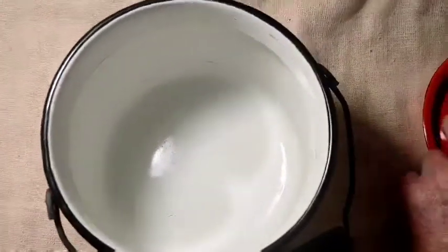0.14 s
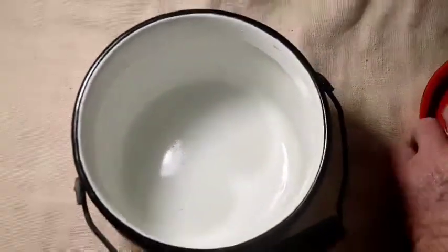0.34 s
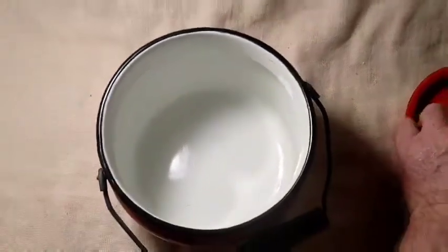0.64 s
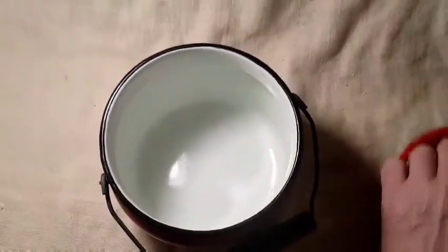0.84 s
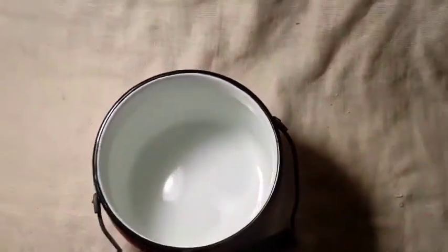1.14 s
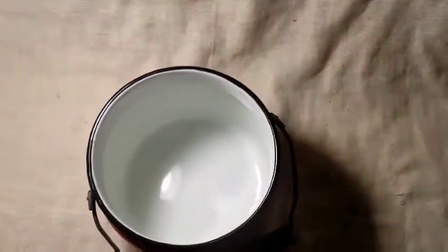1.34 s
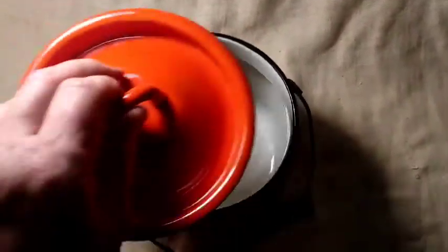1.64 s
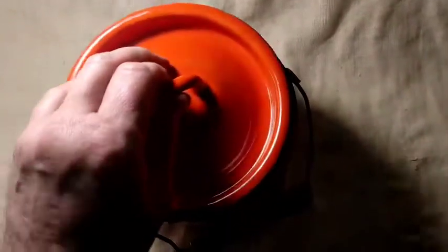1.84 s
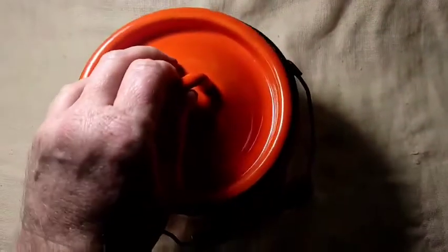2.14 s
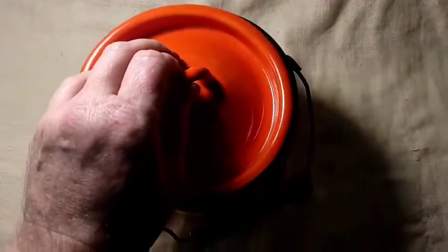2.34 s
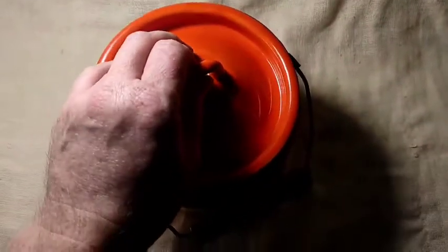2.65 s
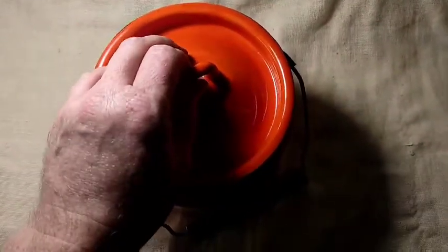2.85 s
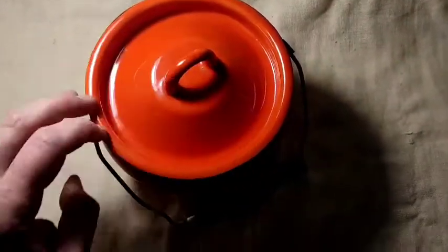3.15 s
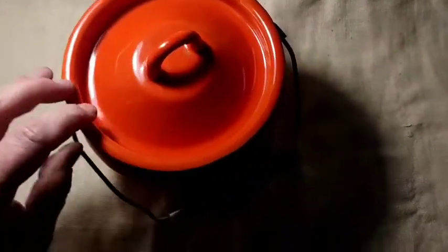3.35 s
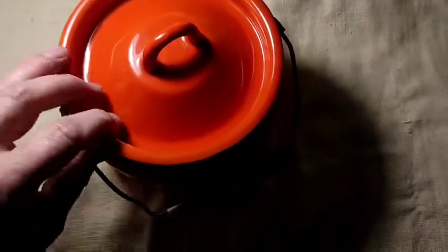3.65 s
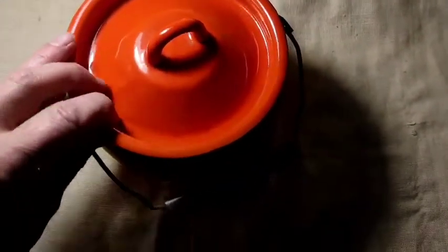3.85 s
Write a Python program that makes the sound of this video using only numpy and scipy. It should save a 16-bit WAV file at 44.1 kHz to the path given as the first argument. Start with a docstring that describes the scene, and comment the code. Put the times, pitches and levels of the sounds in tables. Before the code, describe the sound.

An enamel lid clanks onto an empty metal can, then settles with a hollow boom.

```python
"""A quiet room hums and hisses. A soft thud and a bright tick open the scene; an enamelled steel lid rings
faintly in the hand and a thin squeak glides by. At 2.1 s the lid strikes the rim of an empty enamelled
can standing on cloth: each hit is a chatter of tiny touches that sets the metal ringing and clattering.
The lid slides, drops into its seat at 2.75 s with a hollow boom of trapped air and rubs on the rim.
A faint gritty swell leads into a last nudge at 3.8 s. A short room echo follows the hits."""
import sys
import numpy as np
from scipy import signal
from scipy.io import wavfile

SR = 44100
rng = np.random.default_rng(int(sys.argv[2]) if len(sys.argv) > 2 else 0)


def dump_mix(stems):
    """Bounce the given channels to the path in sys.argv[1] as a 16-bit WAV at rate SR."""
    frames = np.atleast_2d(stems).T  # one column per channel
    limited = np.clip(frames, -1, 1)  # hard clip at full scale
    pcm = np.round(limited * 32767).astype(np.int16)
    wavfile.write(sys.argv[1], SR, pcm)


N = 176400
TIME = np.arange(N) / SR

# colour of the room tone: f/Hz, relative level/dB per Hz
ROOM_SPECTRUM = [(20, 0.5), (45, -13.5), (80, -13.5), (120, -20), (180, -6), (250, -4), (330, -14),
                 (520, -10), (900, -13.5), (1200, -24.5), (2500, -24.5), (4000, -28), (8500, -28),
                 (12500, -54.5), (18000, -70)]
# level of the treble hiss, which swells with faint rustles: t/s, level/dB (unity gain at TREBLE_UNITY_DB)
TREBLE_LEVEL = [(0.0, -66), (0.05, -75.5), (0.06, -63.5), (0.14, -74), (0.3, -72), (0.34, -77.5),
                (0.41, -74), (0.55, -75.5), (0.65, -69.5), (0.82, -76.5), (1.0, -73), (1.01, -69),
                (1.15, -77), (1.17, -71.5), (1.37, -74), (1.47, -70.5), (1.53, -74.5), (2.1, -80)]
# how alike the room tone is left and right: f/Hz, correlation (negatives play as about 0)
STEREO_LIKENESS = [(60, 0.376), (180, 0.3), (550, 0.034), (1650, 0.114), (4970, -0.02), (15000, -0.06)]
# room hums: f/Hz, level/dB, width of the noise skirt/Hz, noise-to-tone ratio
HUMS = [(118.4, -62.5, 4.8, 0.079), (260.3, -60.5, 5.6, 0.3), (514, -73.5, 5.7, 0.28)]
# can pressed into the cloth: t/s, level/dB
THUDS = [(.058, -53), (2.131, -51), (2.764, -36), (2.866, -43), (3.221, -34), (3.82, -37)]
# partials of the tick: f/Hz, level/dB, t60/s
TICK_MODES = [(3160, -58, 0.15), (3900, -52, .1), (4080, -53, 0.074), (4440, -50, 0.065),
              (5000, -52, 0.041), (5350, -55, 0.045), (6870, -54, 0.086), (8560, -46, 0.055)]
# faint tones, mostly the held lid ringing, plus a steady whistle beside the squeak: start/s, end/s, f/Hz,
# level/dB
FAINT_RINGS = [(.06, .14, 3042, -77), (.25, .3, 4520, -82), (.38, .52, 4520, -82), (.38, .53, 4040, -86),
               (.56, .66, 2860, -78), (.62, .69, 8350, -77), (.67, .73, 4520, -82)]
# glide of the squeak: t/s, f/Hz, level/dB
SQUEAK_GLIDE = [(.595, 7800, -95), (.62, 8350, -80), (.65, 8880, -78), (.69, 9120, -78), (.72, 8950, -80),
                (.77, 8050, -82), (.82, 7600, -88), (.87, 8400, -77), (.92, 9250, -80), (.965, 9620, -79),
                (1.01, 9350, -92)]
TILTED, SEATED, NUDGED, SETTLED = 0, 1, 2, 3   # how the lid sits
# lid meets rim: t/s, level/dB, chatter length/s, brightness/dB per octave,
# boom level/dB (before BOOM_GAIN_DB), boom f/Hz, how the lid sits
CONTACTS = [(2.126, -18.5, 0.014, 4, -21.5, 334.6, TILTED), (2.144, -20.5, 0.013, 1, -27.5, 311, TILTED),
            (2.275, -49.5, 0.0097, -6, -46, 340, TILTED), (2.346, -64, 0.0053, -10.5, -60.5, 322, TILTED),
            (2.462, -50.5, 0.0099, -6.5, -70, 298, TILTED), (2.589, -50.5, 0.022, 3.5, -49.5, 310, SEATED),
            (2.621, -57, 0.014, -8.5, -47, 315, TILTED), (2.703, -45, 0.095, 3.5, -37, 297, TILTED),
            (2.752, -26.5, 0.0063, -0.5, -23, 181.8, SEATED),
            (2.767, -27.5, 0.016, 2.5, -25.5, 176.6, SEATED), (2.811, -37, 0.023, -3.5, -45.5, 345, SEATED),
            (2.852, -34.5, 0.0065, -3, -34.5, 255, SETTLED), (2.863, -22.5, .012, 1, -28.5, 171.6, SETTLED),
            (2.962, -38, 0.0053, -3.5, -51, 194, NUDGED), (3.209, -62, .005, 3, -63, 180, SEATED),
            (3.802, -23.5, 0.012, 1.5, -40, 164, NUDGED), (3.813, -24.5, 0.012, -2.5, -30.5, 167, NUDGED)]
# clear modes of lid and can: f/Hz, t60/s, relative level/dB when tilted, seated, nudged, settled
METAL_MODES = [(345, 0.11, -14, -4.5, -15.5, -4), (616, 0.088, -15, -10.5, -8, -12.5),
               (844, 0.14, -15.5, -10, -3, -26), (1340, .16, -10, -5, -10.5, -12),
               (1438, .14, 0.5, -16, -7.5, -24), (1520, .14, -7.5, -3.5, -9.5, -5.5),
               (1549, 0.084, -11, -9, -14, -2), (1865, .12, -12.5, -16, -18, -10),
               (2090, .12, -11.5, -8.5, -9, -29), (2508, .45, -21, -26.5, -26.5, -25),
               (2527, .15, -9.5, -10, -13.5, -23), (2723, .2, -13, -12, -14, -6),
               (2741, 0.43, -9.5, -10, -14, -18), (3013, 0.19, -4, -31, -14, -15),
               (3080, 0.17, 1.5, -3.5, -13, -13.5), (3260, 0.071, -22.5, -20, -11, -25),
               (3550, .15, -17.5, -22, -26, -5.5), (3910, 0.093, -0.5, -2, 2, -7),
               (4030, .14, -13, -5, -7, -22), (4520, 0.079, -7.5, -9, -28, 4),
               (4700, 0.17, -7.5, -12, -14, -16), (4930, .13, -11.5, -29, -33, -22),
               (5383, .11, -3, -0.5, -2.5, -13), (5450, .13, -5.5, -2, -1, -4),
               (5940, .5, -41.5, -34, -50, -13), (6130, .13, -8.5, -2, -9, 1),
               (6206, .14, -2.5, -9.5, -16, -3), (6470, .18, -18.5, -22, -7, -20),
               (6980, .12, -15.5, -11.5, -3, -15), (7122, 0.11, -9.5, -11, -13, -2),
               (7646, 0.058, -0.5, -2, -1.5, -1.5), (8190, .07, -22, -3.5, -10.5, -18),
               (8350, 0.02, -23.5, -12, -18, -7)]
# colour of the clatter, one curve for each way the lid sits: f/Hz, relative level/dB per Hz
CLATTER_SPECTRA = [
    [(240, -45), (400, -10), (1390, -7), (2290, -9), (2980, -10.5), (5380, -6), (7820, -16.5), (10500, -41),
     (12500, -37.5), (15700, -58), (16500, -67.5)],
    [(240, -38), (400, -15.5), (899, -6), (1460, -4), (2320, -6), (2670, -1.5), (6090, -6.5),
     (13700, -21.5), (16500, -27.5)],
    [(240, -47), (400, -29), (831, 5), (986, -6.5), (1330, -7.5), (2930, -7.5), (7010, -5.5),
     (10000, -20.5), (12500, -21), (15300, -29), (16500, -50)],
    [(240, -38), (400, -13), (899, -5), (1460, -5.5), (2320, -6), (4500, -2.5), (6090, 2), (9000, -20),
     (13700, -27), (16500, -23)],
]
# three slides of the lid on the rim, then a faint gritty swell just before the last nudge:
# t/s, level/dB (before GRIT_GAIN_DB)
GRIT_CURVES = [
    [(2.25, -56.5), (2.414, -59.5), (2.448, -50), (2.636, -54), (2.686, -71), (2.702, -30), (2.72, -56)],
    [(2.77, -61), (2.785, -30), (2.82, -34), (2.85, -35), (2.89, -36), (2.92, -55), (2.945, -63)],
    [(3.28, -88), (3.326, -56.5), (3.332, -61), (3.426, -56.5), (3.462, -70.5), (3.472, -51), (3.6, -104)],
    [(3.74, -80.5), (3.785, -50.5), (3.8, -45)],
]

SIDES = np.array([[1], [-1]])   # left up, right down
LEFT_DB, LEFT_LAG_S = 1.4, 0.00018
ROOM_TONE_DB, TONE_LEFT_DB, TONE_TOP_HZ = -56.5, 1.6, 8890
TREBLE_UNITY_DB, TREBLE_LATE_DB = -71, -76.5
TOUCHES_PER_S, FIRST_TOUCH, CHATTER_FADE = 2500, 1.6, 0.69
CLATTER_DB, CLATTER_T60_S, CLATTER_DAMPING, CLATTER_ALIKE = 6.5, 0.06, 0.19, 0.45
BOOM_GAIN_DB, BOOM_RISE_S, BOOM_T60_S = 12, 0.009, 0.1
SEALED_HZ, BOOM_SAG, BOOM_SAG_S = 250, 0.98, 0.0048   # below SEALED_HZ the squeezed air starts sharp
GRIT_GAIN_DB, GRIT_RING_DB, GRIT_DB_PER_OCTAVE = -8.5, -32, -1.5
GRIT_DAMPING_S = 0.12   # longer rings are stirred less by the grit
SLIDE_AIR_DB, SLIDE_AIR_HZ = -25, 305.4
ECHO_DB, ROOM_T60_S, WALL_CUT_HZ = -14, 0.26, 12000


def from_db(db):
    """Level to gain."""
    return 10 ** (np.asarray(db) / 20)


def rms_one(x):
    """Scale to unit power."""
    return x / np.sqrt(np.mean(x ** 2) + 1e-20)


def filtered(x, order, hz, kind="low"):
    """Butterworth filter."""
    return signal.sosfilt(signal.butter(order, hz, kind, fs=SR, output="sos"), x)


def at_hz(points, hz):
    """Read a curve on a log frequency axis."""
    freqs, values = np.transpose(points)
    return np.interp(np.log(hz), np.log(freqs), values)


def in_time(rows, outside):
    """A level curve at every sample."""
    times, db = np.transpose(rows)
    return np.interp(TIME, times, db, outside, outside)


def ring(force, hz, t60):
    """Resonator: a unit click starts a dying sine of height 1."""
    r, w = from_db(-60 / (t60 * SR)), 2 * np.pi * hz / SR
    return signal.lfilter([0, np.sin(w)], [1, -2 * r * np.cos(w), r * r], force + 1e-18)


def waver(depth_db, rate_hz=30):
    """A gain that wanders at random around unity."""
    drift = filtered(rng.standard_normal(N + SR), 2, rate_hz)[SR:]
    return from_db(depth_db * rms_one(drift))


def grit(per_s, spread_db=3.5):
    """Uneven random clicks, unit power."""
    chance, size, sign = rng.random((3, N))
    height = from_db(-spread_db * np.log(size + 0.069))
    return rms_one((chance < per_s / SR) * height * np.sign(sign - .5))


def placed(x):
    """Pan mono or stereo: louder and slightly later on the left."""
    left, right = np.broadcast_to(x, (2, N))
    return from_db(LEFT_DB * SIDES) * np.array([np.interp(TIME - LEFT_LAG_S, TIME, left), right])


def room_tone():
    """A wide bed of noise in half-octave bands; the treble flickers."""
    out, white = 0, rng.standard_normal((2, 2, N))
    treble_db = in_time(TREBLE_LEVEL, TREBLE_LATE_DB) - TREBLE_UNITY_DB
    edges = 18 * 2 ** np.arange(0, 10, .5)
    for k, (low, high) in enumerate(zip(edges, edges[1:])):
        hz = np.sqrt(low * high)
        mid, side = filtered(white[k % 2], 2, [low, high], "band")
        alike = at_hz(np.maximum(STEREO_LIKENESS, 1e-3), hz)
        band = np.sqrt(1 + alike) * mid + np.sqrt(1 - alike) * side * SIDES
        treble_share = np.clip(np.log2(hz / 1500), 0, 1)
        out += from_db(at_hz(ROOM_SPECTRUM, hz) + treble_share * treble_db) * band
    return from_db(ROOM_TONE_DB + TONE_LEFT_DB * SIDES) * rms_one(filtered(out, 6, TONE_TOP_HZ))


def hums():
    """Low room tones, each made unsteady by a narrow skirt of noise."""
    out = 0
    for hz, db, width, ratio in HUMS:
        skirt = rms_one(ring(rng.standard_normal(N), hz, t60=9.3 / width))
        out += from_db(db) * rms_one(np.sin(2 * np.pi * hz * TIME) + ratio * skirt)
    return placed(out)


def thuds(hz=82.2, t60=0.099):
    """The can presses into the cloth: soft, quickly damped bass notes."""
    out = 0
    for start, db in THUDS:
        age = np.clip(TIME - start, 0, 1)
        attack = np.minimum(age * hz, 1)
        out += attack * from_db(db - 60 * age / t60) * np.sin(2 * np.pi * hz * age)
    return placed(out)


def tick(start=0.058, noise_db=-41.5, noise_hz=4760, noise_t60=0.046):
    """A small bright tick: high partials over a puff of noise."""
    age = np.clip(TIME - start, 0, 1)
    ping = sum(from_db(db - 60 * age / t60) * np.sin(2 * np.pi * hz * age) for hz, db, t60 in TICK_MODES)
    noise = filtered(rng.standard_normal(N), 1, [noise_hz / 2, noise_hz * 2], "band")
    return placed(ping + (age > 0) * noise * from_db(noise_db - 60 * age / noise_t60))


def faint_rings():
    """Short, wavering swells of one pitch each: the held lid sings, and a steady whistle sits beside the
    squeak."""
    out = 0
    for start, end, hz, db in FAINT_RINGS:
        swell = np.sin(np.pi * np.clip((TIME - start) / (end - start), 0, 1))
        out += from_db(db) * waver(depth_db=2.5) * swell * np.sin(2 * np.pi * hz * TIME)
    return out * from_db(LEFT_DB * SIDES)


def squeak():
    """A thin, wavering whistle that glides up, down and up again."""
    times, hz, db = np.transpose(SQUEAK_GLIDE)
    cycles = np.cumsum(np.interp(TIME, times, hz)) / SR
    envelope = from_db(np.interp(TIME, times, db, -200, -200)) * waver(depth_db=2.5)
    return envelope * np.sin(2 * np.pi * cycles) * from_db(LEFT_DB * SIDES)


def strikes(spread_db=1.5):
    """The lid chatters on the rim: the force on each clear mode and on each colour of clatter."""
    touches = grit(TOUCHES_PER_S)
    hz, _, *mode_db = np.transpose(METAL_MODES)
    mode_force, clatter_force = np.zeros((len(hz), N)), np.zeros((len(CLATTER_SPECTRA), N))
    for start, db, length, brightness, _, _, sits in CONTACTS:
        span = slice(int(start * SR), int((start + length) * SR))
        chatter = rms_one(touches[span])
        chatter[0] += FIRST_TOUCH
        chatter *= np.exp(-CHATTER_FADE * (TIME[span] - start) / length)
        # even out how strongly this chatter happens to excite each mode
        response = np.abs(np.exp(2j * np.pi * np.outer(hz, TIME[span])) @ chatter)
        response += np.linalg.norm(chatter) / 2
        levels = db + mode_db[sits] + brightness * np.log2(hz / 3000) + rng.normal(0, spread_db, len(hz))
        mode_force[:, span] += np.outer(from_db(levels) / response, chatter)
        dull = np.clip(-brightness / 6, -.9, .9)
        coloured = signal.lfilter([1 - abs(dull)], [1, -dull], chatter)
        clatter_force[sits, span] += from_db(db + CLATTER_DB) * coloured / np.sqrt(length * 100)
    return mode_force, clatter_force


def metal_ring(forces, pan_spread_db=2):
    """Lid and can ring in clear modes; loose contact makes each one waver."""
    out, wobble = 0, waver(depth_db=3)
    for (hz, t60, *_), force in zip(METAL_MODES, forces):
        tone = ring(force, hz, t60) * np.roll(wobble, rng.integers(N))
        lag = round(SR * min(1 / hz / 4, LEFT_LAG_S))   # up to a quarter cycle late on the left
        pan_db = LEFT_DB + rng.normal(0, pan_spread_db) / 2
        out += np.array([np.roll(tone, lag), tone]) * from_db(pan_db * SIDES)
    return out


def clatter(force, spectrum, modes=240):
    """A crowd of short, hand-damped modes at chance pitches; the high ones die sooner."""
    t = np.arange(SR // 6)[:, None] / SR
    detune, life, phase, *side_phase = rng.random((5, modes))
    hz = 400 + 15600 * ((np.arange(modes) + detune) / modes) ** 1.5
    t60 = CLATTER_T60_S * (.5 + life) * (3000 / hz) ** CLATTER_DAMPING
    envelope = from_db(at_hz(spectrum, hz) - 60 * t / t60) * np.sqrt(np.gradient(hz))
    phases = phase + (1 - CLATTER_ALIKE) * (np.array(side_phase) - .5)
    response = np.array([(envelope * np.sin(2 * np.pi * (hz * t + p))).sum(axis=1) for p in phases])
    response[:, :32] *= np.arange(32) / 32   # soften the attack
    response /= np.sqrt((response ** 2).sum() / 2)
    return placed(signal.fftconvolve(force[None], response)[:, :N])


def boom():
    """The air in the can swells and dies; the better the lid seals, the lower the pitch."""
    out, t = np.zeros(N + SR), np.arange(SR // 4) / SR
    sag = BOOM_SAG * BOOM_SAG_S * (1 - np.exp(-t / BOOM_SAG_S))
    swell = (1 - np.exp(-t / BOOM_RISE_S)) ** 2
    for start, _, _, _, db, hz, _ in CONTACTS:
        cycles = hz * (t + (hz < SEALED_HZ) * sag)
        envelope = swell * from_db(db + BOOM_GAIN_DB - 60 * t / BOOM_T60_S)
        out[int(start * SR):][:len(t)] += envelope * np.sin(2 * np.pi * cycles)
    return placed(out[:N])


def slides_and_swell():
    """Fitful grit drives modes and clatter; the first slide also stirs the air in the can."""
    envelope = sum(from_db(in_time(curve, -200) + GRIT_GAIN_DB) for curve in GRIT_CURVES)
    grains = grit(per_s=1400) * envelope * waver(depth_db=3.5, rate_hz=24)
    hz, t60, *mode_db = np.transpose(METAL_MODES)
    gains = from_db(mode_db[SEATED] + GRIT_RING_DB + GRIT_DB_PER_OCTAVE * np.log2(hz / 3000))
    mode_force = np.outer(gains * np.minimum(GRIT_DAMPING_S / t60, 1), grains)
    first_slide_end, second_slide_start = GRIT_CURVES[0][-1][0], GRIT_CURVES[1][0][0]
    clatter_force = np.zeros((len(CLATTER_SPECTRA), N))
    clatter_force[TILTED] = grains * (TIME < second_slide_start)
    clatter_force[SEATED] = grains * (TIME >= second_slide_start)
    air = from_db(SLIDE_AIR_DB) * ring(grains * (TIME < first_slide_end), SLIDE_AIR_HZ, t60=0.098)
    return mode_force, clatter_force, placed(air)


def lid():
    """Strikes and grit drive the same metal; the lows are rolled off."""
    mode_hits, clatter_hits = strikes()
    mode_grit, clatter_grit, air = slides_and_swell()
    metal = metal_ring(mode_hits + mode_grit)
    for force, spectrum in zip(clatter_hits + clatter_grit, CLATTER_SPECTRA):
        metal += clatter(force, spectrum)
    return filtered(metal + air, 2, 150, "high")


def room_echo(x):
    """Wall reflections: eight feedback delays a side, duller on every round."""
    out, dull = np.zeros((2, N)), np.exp(-2 * np.pi * WALL_CUT_HZ / SR)
    for k, lag in enumerate((rng.uniform(.012, .035, 16) * SR).astype(int)):
        loop, state = x.copy(), [0.]
        gain = from_db(-60 * lag / SR / ROOM_T60_S)
        for i in range(lag, N, lag):
            back, state = signal.lfilter([gain * (1 - dull)], [1, -dull], loop[i - lag:i], zi=state)
            loop[i:i + lag] += back[:N - i]
        out[k % 2] += (loop - x) * (-1) ** (k // 2)
    return out


def scene():
    """The mix: thuds, tick and lid feed the echo; the other layers stay dry."""
    near = thuds() + tick() + lid()
    echo = from_db(ECHO_DB) * room_echo(near[1] + 1e-18)
    return room_tone() + hums() + near + faint_rings() + squeak() + boom() + echo


def record(dry, low_hz=30, top_hz=16600):
    """Trim the deepest bass and cut the very top steeply."""
    top_cut = signal.cheby2(12, 70, top_hz, fs=SR, output="sos")
    return signal.sosfilt(top_cut, filtered(dry, 2, low_hz, "high"))


dry = scene()
out = record(dry)
dump_mix(out)
```